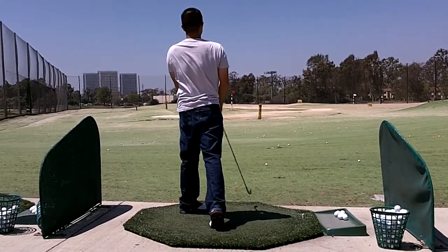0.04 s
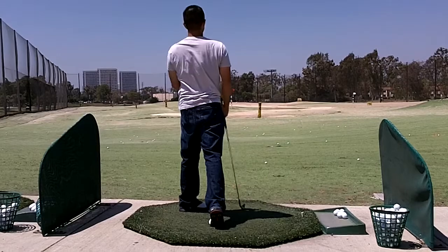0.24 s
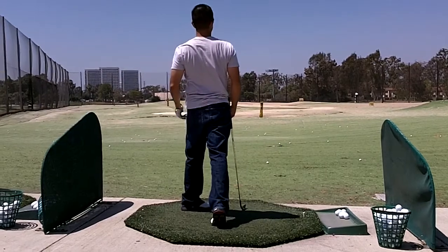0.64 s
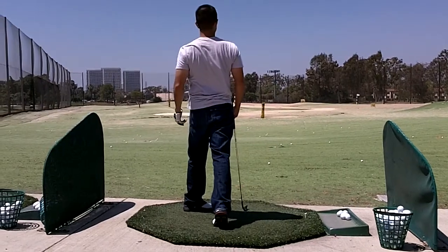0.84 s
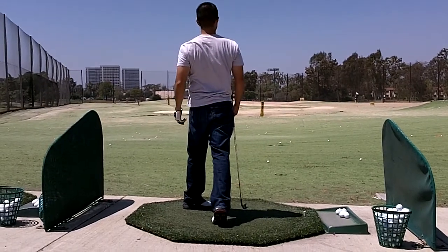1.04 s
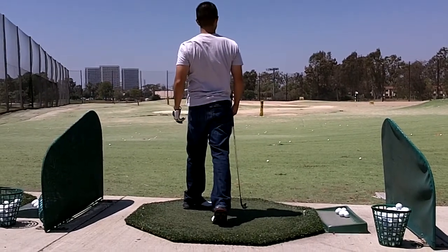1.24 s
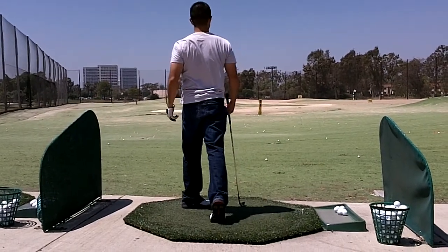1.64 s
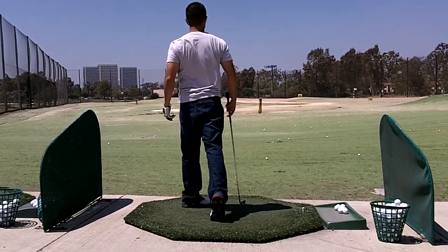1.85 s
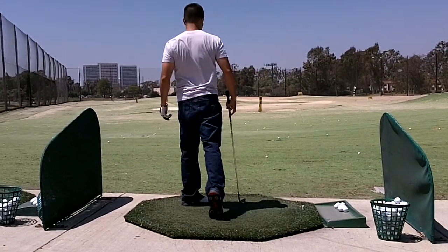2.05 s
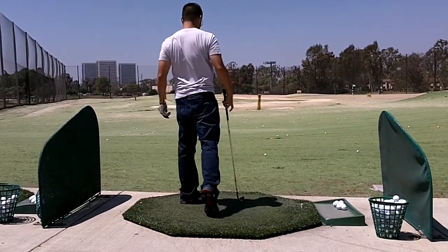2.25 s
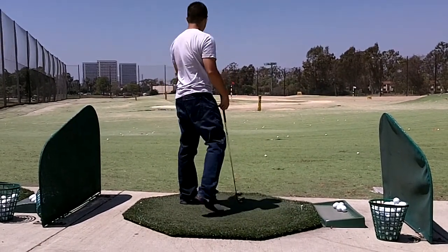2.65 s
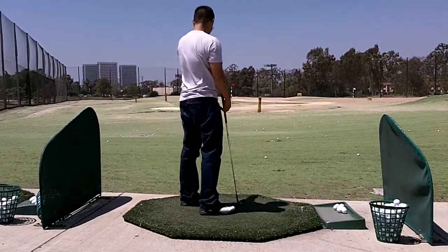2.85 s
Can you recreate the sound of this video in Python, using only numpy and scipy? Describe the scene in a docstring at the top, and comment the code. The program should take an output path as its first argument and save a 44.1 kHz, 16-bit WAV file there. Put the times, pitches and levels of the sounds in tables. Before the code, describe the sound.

A golf club swishes faintly and hits a ball with a sharp, briefly ringing crack that echoes across an outdoor driving range. Wind rumbles on the microphone throughout, over distant traffic and a faint machine hum.

```python
"""Wind buffets the microphone at an outdoor golf range, over distant traffic and a machine hum.
Other golfers swing and hit far away, and a bird calls once. The gusts peak as a nearby shaft swishes;
at 1.49 s the club strikes the ball with a hard knock, and the modes of its metal head ring briefly.
A bright echo returns off the bays and dies away over the range, while one more far golfer hits.
Throughout, the camera adds a faint electrical tick and hollow notches."""
import sys
import numpy as np
from scipy import signal
from scipy.fft import rfft, irfft
from scipy.io import wavfile

SR = 44100
rng = np.random.default_rng(int(sys.argv[2]) if len(sys.argv) > 2 else 0)


def unload_wav(signal):
    """Save mono or channel-first audio to the path in sys.argv[1] as 16-bit WAV at rate SR, clipped to [-1, 1]."""
    wavfile.write(
        sys.argv[1],
        SR,
        np.round(np.clip(np.atleast_2d(signal).T, -1, 1) * 32767).astype(np.int16),
    )


N = 127890
T = np.arange(N) / SR
STRIKE_S = 1.4887

# Noise spectra of traffic and wind (frequency [Hz], relative density [dB])
TRAFFIC_SPECTRUM = [(30, 9.5), (150, 9.5), (330, 3), (500, 1.5), (750, 0), (1050, 0.5), (1500, -3.5),
                    (2100, -7), (2600, -12.5), (3300, -14.5), (4800, -16.5), (5600, -28), (6500, -27),
                    (9000, -32.5), (12000, -30), (15000, -28.5)]
RUMBLE_SPECTRUM = [(5, -32), (18, 1.5), (38, 4), (70, -2), (130, -5), (200, -16), (300, -27.5),
                   (500, -38.5), (1000, -71), (3000, -96)]
FLUTTER_SPECTRUM = [(40, -20), (140, 2.5), (260, 3.5), (400, -5), (600, -12), (900, -27), (2000, -26.5),
                    (5000, -76)]
# Partials of the machine (frequency [Hz], relative level [dB])
HUM_PARTIALS = [(214, -12), (285.4, -2.5), (356, -12.5), (570.8, -24.5), (641, -22)]
# Envelopes of the hum and the wind (time [s], relative level [dB])
HUM_ENVELOPE = [(0, -49.5), (.7, -49), (1.0, -46), (1.7, -41), (2.3, -44.5), (2.9, -48.5)]
WIND_ENVELOPE = [(0.0, -32), (0.02, -32.5), (0.22, -31), (0.25, -31), (0.31, -34), (0.35, -27.5),
                 (0.39, -37), (0.41, -28), (0.44, -36.5), (0.58, -28.5), (0.77, -35.5), (0.86, -30.5),
                 (0.89, -40), (0.91, -32), (0.97, -36.5), (1.07, -26.5), (1.13, -33), (1.23, -23.5),
                 (1.26, -35.5), (1.28, -19.5), (1.32, -28), (1.41, -17), (1.44, -20), (1.55, -22.5),
                 (1.58, -31), (1.73, -27), (1.76, -34.5), (1.93, -32), (1.99, -35.5), (2.09, -36),
                 (2.24, -24.5), (2.28, -33), (2.37, -31.5), (2.41, -26.5), (2.5, -33), (2.58, -28.5),
                 (2.68, -36), (2.9, -36)]
# Eddies at the microphone (time [s], peak level [dB], half width [s])
EDDY_PULSES = [(.258, -20, 0.0044), (.35, -20, 0.0051), (0.413, -18, 0.0049), (.846, -21, 0.0017),
               (0.853, -12.5, .0015), (1.07, -23.5, 0.0033), (1.11, -25, 0.0014), (1.203, -19.5, 0.0017),
               (1.214, -22, 0.00097), (1.223, -17, 0.0012), (1.227, -14.5, 0.0016), (1.282, -8, .0016),
               (1.311, -14.5, .0017), (1.358, -12.5, 0.00094), (1.39, -12.5, 0.0019), (1.398, -13, 0.00081),
               (1.43, -13, 0.00061), (1.449, -8, 0.00089), (1.54, -7.5, .0012), (1.553, -12.5, .0012),
               (1.673, -17, 0.0026), (1.917, -18, 0.0018), (2.246, -16.5, 0.0049), (2.406, -15.5, 0.0045)]
# Pitch of the bird's call (time [s], frequency [Hz])
BIRD_PITCH = [(1.22, 3850), (1.25, 3700), (1.27, 3400), (1.33, 3200)]
# Impacts in other bays (time [s], level [dB], ring frequency [Hz], T60 [s])
FAR_IMPACTS = [(.6, -44, 3340, .05), (0.756, -55, 4000, .05), (1.899, -49, 4400, .07)]
# Spectra of the scattered crack (frequency [Hz], relative density [dB])
NEAR_SPECTRUM = [(300, -16.5), (1000, -5), (2200, -4.5), (3200, -11), (4000, 2.5), (4700, 1), (5300, -2.5),
                 (6300, -5), (7300, -16.5), (8500, -13), (10500, -17), (12000, -29), (15000, -29)]  # off the mat and dividers
RADIATED_SPECTRUM = [(300, -5), (1000, -10.5), (2200, -11.5), (3200, -15.5), (4000, 1), (4480, 0.5),
                     (4590, 9), (4720, 4.5), (5300, -4.5), (6300, 1), (7300, -17), (9300, -12.5),
                     (10500, -17.5), (12000, -31), (15000, -28)]  # thrown at the bays and the range
FAR_SPECTRUM = [(300, 4.5), (1000, 2.5), (2000, -7), (3200, -13), (4400, -4.5), (5200, -18), (6300, -19.5),
                (9000, -44), (15000, -44)]  # off the far trees and fence
# Echoes off the bays (delay [s], rise [s], energy [dB], T60 [s])
BAY_ECHOES = [(0.044, 0.027, 1, 0.14), (.098, 0.012, -9, 0.13)]
# Reverberation time of the range (frequency [Hz], T60 [s])
RANGE_T60 = [(500, 1), (2000, 1), (4500, 0.6), (6500, 0.45), (9500, .45), (14000, .35)]
# Spectra of shaft in air, sole on mat and club on ball (frequency [Hz], relative density [dB])
SWISH_SPECTRUM = [(300, -21), (800, 3.5), (1500, -2.5), (2500, -13), (3800, -2), (4600, -6.5), (6000, -18),
                  (9000, -26), (15000, -38)]
BRUSH_SPECTRUM = [(200, -24), (1000, 22), (2200, -4), (3200, -9.5), (6000, -18), (10000, -30), (15000, -26)]
KNOCK_SPECTRUM = [(100, -12), (400, -3), (1100, 2.5), (1600, -7), (2300, -7), (3200, -6.5), (4200, -5),
                  (6000, -25), (9500, -29.5), (15000, -39)]
# Modes of the club head (frequency [Hz], relative level [dB], T60 [s])
HEAD_MODES = [(3770, -16, .024), (4035, -20, .035), (4180, -27, .07), (4350, -19, .035), (4590, -22, .16),
              (4650, -17, .028), (4750, -28, .09), (4925, -23, .04), (5890, -38, .02), (8963, -48, .06)]
# Notches of the microphone port (frequency [Hz], half width [Hz], depth [dB])
PORT_NOTCHES = [(2730, 120, 26), (5490, 140, 17), (7880, 160, 19), (10920, 150, 26)]


def amp(db):
    """Amplitude ratio: tenfold for every 20 dB."""
    return 10 ** (np.asarray(db) / 20)


def at_hz(table, hz):
    """Interpolation on a logarithmic frequency axis."""
    f, value = np.transpose(table)
    return np.interp(np.log(hz + 1), np.log(f + 1), value)


def at_time(table):
    """Linear interpolation in time."""
    return np.interp(T, *np.transpose(table))


def filtered_noise(gain_at):
    """Spectral shaping: white noise weighted by gain_at(Hz), scaled to rms 1."""
    x = irfft(rfft(rng.standard_normal(N)) * gain_at(np.fft.rfftfreq(N, 1 / SR)), N)
    return x / np.sqrt(np.mean(x ** 2) + 1e-20)


def noise(spectrum):
    """Stationary noise of a given spectral shape."""
    return filtered_noise(lambda hz: amp(at_hz(spectrum, hz)))


def drift(rate_hz):
    """Slow random fluctuation: noise through a Gaussian low-pass."""
    return filtered_noise(lambda hz: np.exp(-(hz / rate_hz) ** 2))


def minimum_phase(db_at, size=4096):
    """Minimum phase gives the shortest causal pulse with the spectrum db_at(Hz)."""
    log_gain = np.log(amp(db_at(abs(np.fft.fftfreq(size, 1 / SR)))))
    spectrum = np.exp(np.conj(signal.hilbert(log_gain)))
    return np.fft.ifft(spectrum).real[:size // 2]


def burst(start, rise, t60):
    """Linear attack, then exponential decay by 60 dB in t60 seconds."""
    return np.clip((T - start) / rise, 0, 1) * amp(-60 * np.maximum(T - start - rise, 0) / t60)


def place(start, sound):
    """Pure delay of a sound by start seconds."""
    return np.concatenate([np.zeros(max(round(start * SR), 0)), sound, np.zeros(N)])[:N]


def with_energy(sound, db):
    """Normalisation of the total energy to db."""
    return amp(db) * sound / np.linalg.norm(sound)


def whistle(hz, width_hz, peak_s, swell_s, db):
    """Random modulation widens a gliding tone into a narrow band, under a Gaussian envelope."""
    modulation = drift(width_hz) + 1j * drift(width_hz)
    carrier = np.exp(2j * np.pi * np.cumsum(hz) / SR)
    return amp(db) * (modulation * carrier).real * np.exp(-((T - peak_s) / swell_s) ** 2)


def traffic():
    """Distant vehicles add incoherently to a steady, low noise."""
    return amp(-49) * noise(TRAFFIC_SPECTRUM)


def machine_hum():
    """A line spectrum whose partials waver together in pitch and separately in level."""
    warped_time = np.cumsum(1 + .002 * drift(4.03)) / SR
    hum = sum(amp(db + drift(1.9)) * np.sqrt(2) * np.sin(2 * np.pi * hz * warped_time)
              for hz, db in HUM_PARTIALS)
    return amp(at_time(HUM_ENVELOPE)) * hum


def wind():
    """Turbulent pressure on the microphone rumbles; a brighter flutter grows faster with the gusts."""
    lump_db, lump_hz, gust_db = .5, 24.2, -19.5
    level_db = at_time(WIND_ENVELOPE)
    flutter_db = -32.5 + 1.63 * (level_db - gust_db)
    rumble = noise(RUMBLE_SPECTRUM) * amp(level_db - 1 + lump_db * drift(lump_hz))
    flutter = noise(FLUTTER_SPECTRUM) * amp(flutter_db + lump_db * drift(2 * lump_hz))
    return rumble + flutter


def eddies():
    """A passing vortex has a low-pressure core: brief suction between two shoulders of pressure."""
    out = np.zeros(N)
    for time, db, half_width in EDDY_PULSES:
        u = (T - time) / half_width
        suction = (1 - u ** 2 / 2) / (1 + u ** 2 / 2) ** 2
        out -= amp(db) * suction * np.exp(-(u / 6) ** 2)
    return out


def bird():
    """A far bird's note falls in frequency, blurred by distance into a narrow band."""
    return whistle(at_time(BIRD_PITCH), width_hz=60, peak_s=1.26, swell_s=.04, db=-67)


def far_swing():
    """Aeolian tone: the shaft of a neighbour's club sings higher as it speeds up."""
    peak_s, glide_hz_per_s = .595, 3500
    hz = 576.7 + glide_hz_per_s * (T - peak_s)
    return whistle(hz, width_hz=70, peak_s=peak_s, swell_s=.025, db=-51)


def far_hits():
    """Impacts in other bays: damped noise with two resonances, a woody knock and a ping."""
    out = np.zeros(N)
    for time, db, ring_hz, t60 in FAR_IMPACTS:
        knock = [(200, -6), (650, 6), (1100, -8)]
        ping = [(ring_hz * .67, -12), (ring_hz, 0), (ring_hz * 1.15, -10), (7000, -22), (14000, -35)]
        out += amp(db) * burst(time, .0017, t60) * noise(knock + ping)
    return out


def reverberation():
    """The diffuse field over the range decays exponentially, faster in the treble."""
    hz, t, spectrogram = signal.stft(noise(RADIATED_SPECTRUM), SR, nperseg=256)
    decay = amp(-60 * t / at_hz(RANGE_T60, hz)[:, None])
    tail = signal.istft(spectrogram * decay, SR, nperseg=256)[1][:N]
    return place(STRIKE_S + .06, with_energy(tail, -2))


def diffuse_burst(spectrum, delay, rise, energy_db, t60):
    """Incoherent sound that follows the blow, modelled as decaying noise."""
    return with_energy(noise(spectrum) * burst(STRIKE_S + delay, rise, t60), energy_db)


def echoes():
    """Diffuse reflection: the longer the path, the later the crack returns."""
    near = diffuse_burst(NEAR_SPECTRUM, delay=0, rise=.0018, energy_db=-1, t60=.11)
    far = diffuse_burst(FAR_SPECTRUM, delay=.28, rise=.22, energy_db=-12.5, t60=2.8)
    bays = sum(diffuse_burst(RADIATED_SPECTRUM, *echo) for echo in BAY_ECHOES)
    return near + bays + far


def swish():
    """Flow noise round the shaft grows as the club speeds up, and stops at the blow."""
    swell = np.exp(-abs(T - STRIKE_S) / .068) * (T < STRIKE_S)
    return amp(-50.5) * noise(SWISH_SPECTRUM) * swell


def strike():
    """The ball's impact knocks and excites the hollow head's damped modes; the sole brushes the mat."""
    rise_s, ground_delay_s = .00035, .0048
    pulse = place(0, minimum_phase(lambda hz: at_hz(KNOCK_SPECTRUM, hz)))
    ring = sum(amp(db - .5) * burst(0, rise_s, t60) * np.sin(2 * np.pi * hz * T)
               for hz, db, t60 in HEAD_MODES)
    direct = with_energy(pulse, 7.5) + ring
    reflected = amp(-5) * ring * burst(0, rise_s, t60=.012)
    brush = diffuse_burst(BRUSH_SPECTRUM, delay=0, rise=.0011, energy_db=-11, t60=.03)
    return place(STRIKE_S, direct) + place(STRIKE_S + ground_delay_s, reflected) + brush


def scene():
    """Superposition: the pressures of all sources add at one microphone."""
    drive = swish() + strike() + reverberation() + echoes()
    ambience = far_hits() + wind() + eddies() + machine_hum() + traffic() + far_swing() + bird()
    return (drive + ambience)[None]


def camera_tick():
    """The camera's electronics add a periodic train of tiny Gaussian tone pulses."""
    first_s, rate_hz, width_s, pitch_hz = .0034, 60, .00045, 7250
    offset_s = (((T - first_s) * rate_hz + .5) % 1 - .5) / rate_hz  # from the nearest pulse
    return amp(-62) * np.exp(-(offset_s / width_s) ** 2) * np.cos(2 * np.pi * pitch_hz * offset_s)


def record(dry):
    """Antiresonances of the microphone port notch the sound; the tick joins; a low-pass limits the band."""
    port = minimum_phase(
        lambda f: -sum(depth / (1 + ((f - hz) / width) ** 2) for hz, width, depth in PORT_NOTCHES))
    sound = signal.oaconvolve(dry, port[None])[:, :N] + camera_tick()
    low_pass = signal.firwin(511, 15450, window=("kaiser", 9), fs=SR)
    return signal.oaconvolve(sound, low_pass[None], "same")


dry = scene()
out = record(dry)
unload_wav(out)
```